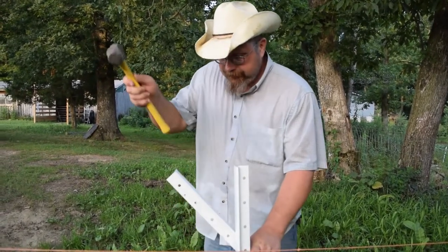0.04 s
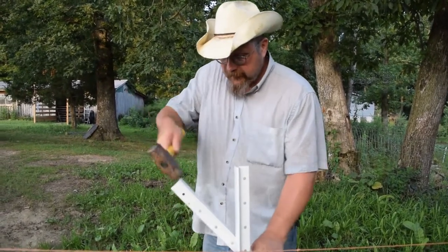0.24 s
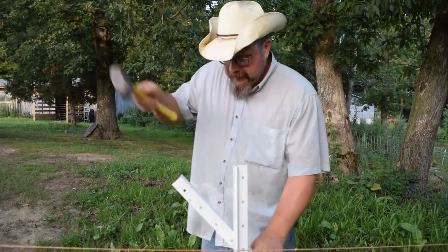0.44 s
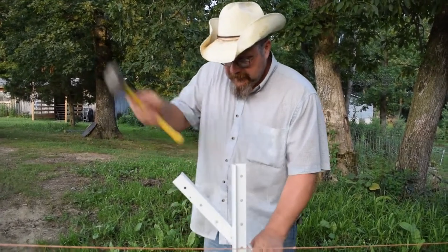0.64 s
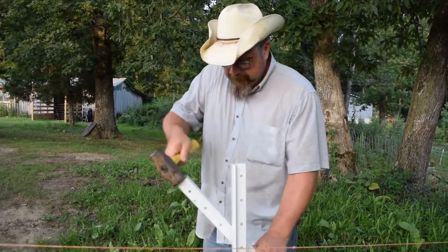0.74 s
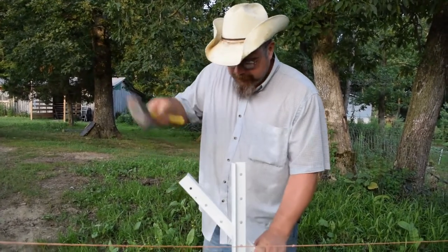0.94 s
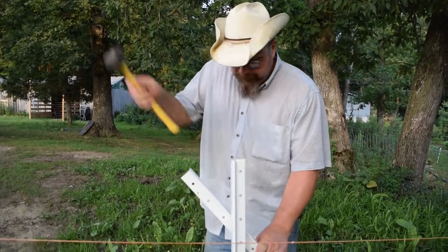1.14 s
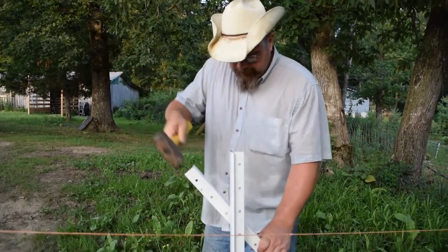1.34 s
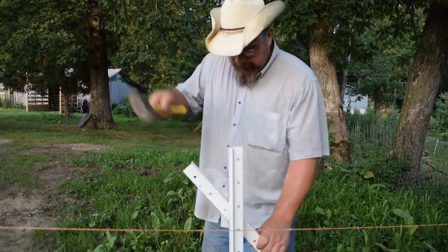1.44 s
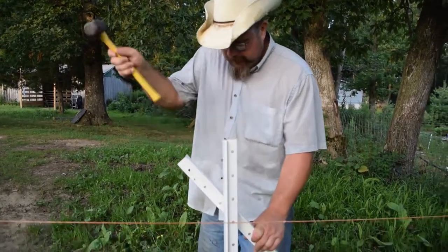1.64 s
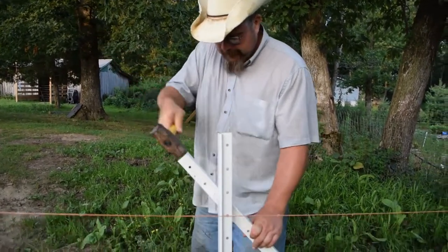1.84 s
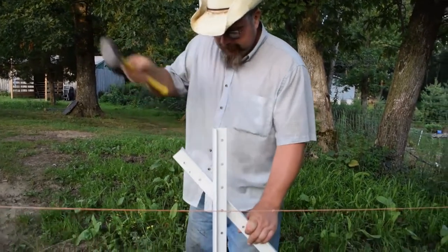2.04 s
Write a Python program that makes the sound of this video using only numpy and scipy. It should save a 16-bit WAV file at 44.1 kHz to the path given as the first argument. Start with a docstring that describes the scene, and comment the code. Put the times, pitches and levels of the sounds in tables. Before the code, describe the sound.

Close, overloaded hammer blows on hollow plastic: four sharp double-edged whacks with low thumps and short scattered return from trees. The loose brace rattles softly between hits, over quiet yard air, insects and a distant motor.

```python
"""On a lawn near trees, a steel hammer drives the plastic brace of a fence post into the soil.
Four hard blows overload the microphone: each is a noise crack with ringing modes of the brace,
a jolt against the post, a low thud of decaying sines and a noise return from the trees.
The loose brace knocks lightly between blows, as a short push and a damped ring.
Behind it are insects (resonated noise), a far motor (wavering sines) and outdoor air (shaped noise)."""
import sys
import numpy as np
from scipy import signal
from scipy.io import wavfile

SR = 44100
rng = np.random.default_rng(int(sys.argv[2]) if len(sys.argv) > 2 else 0)


def store_wav(level_fs):
    """Save 16-bit WAV to argv[1]."""
    pcm = np.round(np.clip(np.atleast_2d(level_fs), -1, 1) * 32767)
    wavfile.write(sys.argv[1], SR, pcm.T.astype(np.int16))


N = 92610
T = np.arange(N) / SR

# modes of the plastic brace, before emphasis by the place hit:
# (frequency [Hz], mean level [dB], 60 dB decay time when struck hard [s])
BRACE_MODES = [(267.4, -17.5, 0.073), (344, -20, .07), (463.4, -18, 0.095), (671, -19.5, .05),
               (891.4, -12.5, 0.063), (1227, -9.5, 0.05), (1400, -11.5, .07), (1669, -12, 0.047),
               (1860, -5, 0.027), (2114, -11, 0.037), (2270, -7.5, 0.05), (2456, -8.5, 0.034),
               (2632, -5.5, 0.04), (2820, -9, 0.055), (3052, -6, 0.017), (3437, -13, 0.05),
               (3690, -20.5, 0.04), (4477, -15.5, 0.08), (4676, -3, 0.022)]


def blows():
    """The hammer lands, the brace flexes and jolts against the post, the soil thuds and the trees answer."""
    # hammer blows, before the microphone overloads: (time [s], strike level [dB],
    # brightness tilt [dB per octave], lower and upper strongest ring [Hz],
    # jolt delay [s], jolt level [dB], hold of the jolt's crack [s], jolt low-pass [Hz],
    # bending pitch [Hz], bending level [dB], thud delay [s], thud level [dB])
    blow_table = [(0.2001, 2.8, -1, 1370, 1610, .0168, -5, 0.0061, 4500, 254.8, -16, .017, 6.4),
                  (0.7365, 2.2, -0.32, 2250, 4460, 0.01, -1.5, 0.0043, 3000, 201.6, -13.5, 0.01, 8.2),
                  (1.2616, 4.7, 0.25, 2010, 2600, .0105, -9.5, 0.0048, 5000, 213.4, -11, 0.0093, 6.2),
                  (1.8014, 2.3, 1, 2085, 2580, .0100, -8, 0.0074, 7100, 227.3, -17.5, 0.0082, 8.9)]
    out = np.zeros(N)
    for (s, db, tilt_db, lower_hz, upper_hz, jolt_s, jolt_db, jolt_hold_s, jolt_hz,
         bend_hz, bend_db, thud_s, thud_db) in blow_table:
        rings_hz = (lower_hz, upper_hz)
        strike = from_db(db) * contact(tilt_db, rings_hz, hold_s=0.0053)
        flex = from_db(bend_db) * bending(bend_hz)
        jolt = from_db(jolt_db) * butter(contact(tilt_db, rings_hz, jolt_hold_s), jolt_hz, "low", order=1)
        soil = from_db(thud_db) * thud()
        blow = strike + flex + delayed(jolt, jolt_s) + delayed(soil, thud_s) + scatter(tilt_db)
        out += delayed(blow, s)
    return out


def contact(tilt_db, rings_hz, hold_s):
    """One hard contact on the brace: a chattering crack of many damped higher modes and a short hollow ring."""
    # colour of the crack: (frequency [Hz], relative level per Hz [dB])
    crack_spectrum = [(150, 3), (600, -3), (1050, -8.5), (1600, -1.5), (2600, -1), (3800, -5.5), (5000, -5),
                      (8000, -15), (15000, -27.5)]
    crack_db, crack_t60_s = 2, 0.035
    chatter_db, chatter_per_s = 5, 682
    noise = noise_bands(crack_spectrum, tilt_db)[1].sum(0)
    crack = rms_one(noise * from_db(chatter_db * wander(chatter_per_s)))
    crack = from_db(crack_db) * crack * dying(crack_t60_s, hold_s)
    return emphasise(crack + ring(BRACE_MODES), rings_hz)


def emphasise(x, rings_hz):
    """Where the brace is hit decides which of its modes ring most: resonances add to the sound."""
    boost_db, ring_q = -4.5, 14.5
    resonant = sum(signal.lfilter(*signal.iirpeak(hz, ring_q, fs=SR), x) for hz in rings_hz)
    return x + from_db(boost_db) * resonant


def bending(hz):
    """The whole brace flexes under the blow: one low tone swells, holds and dies."""
    t60_s, hold_s, rise_s = 0.08, 0.02, 0.0076
    return np.sin(2 * np.pi * hz * T) * dying(t60_s, hold_s) * (1 - np.exp(-T / rise_s))


def thud():
    """Post and soil take the blow softly: low modes with a gradual onset."""
    # modes before the low cut: (frequency [Hz], mean level [dB], 60 dB decay time [s])
    soil_modes = [(70.5, -25, 0.13), (104, -21, 0.082), (143, -22, .095)]
    rise_s, low_cut_hz = 0.002, 49
    return butter(ring(soil_modes) * (1 - np.exp(-T / rise_s)), low_cut_hz, "high")


def scatter(tilt_db):
    """Uneven return of a blow from grass and near trees, and a fainter, longer one from the far trees."""
    # colour and near decay: (frequency [Hz], relative level per Hz [dB], near 60 dB decay time [s])
    trees = [(146, 3.5, 0.21), (500, -4.5, 0.27), (1090, -6.5, 0.31), (2140, 4, 0.25), (3650, 0.5, 0.31),
             (5840, -4.5, 0.36), (7250, -13.5, 0.31), (9700, -15.5, 0.32), (15000, -42, 0.43)]
    scatter_db, rise_s = -13, 0.015
    patchy_db, patches_per_s = 0.64, 180
    far_db, far_t60_s, far_dull_hz = -23.5, 1, 4700
    near_bands = zip(*noise_bands(trees, tilt_db))
    near = sum(band * dying(at_hz(trees, hz, axis=2)) for hz, band in near_bands)
    far_noise = noise_bands(trees, tilt_db)[1].sum(0)
    far = butter(far_noise, far_dull_hz, "low") * dying(far_t60_s)
    gain = from_db(scatter_db + patchy_db * wander(patches_per_s))
    return gain * (near + from_db(far_db) * far) * (1 - np.exp(-T / rise_s))


def knocks():
    """The loose brace touches the post and bounces once; the knock is muffled and thinned."""
    # light knocks: (time [s], level before emphasis and filtering [dB])
    knock_table = [(0.5395, -27.5), (1.487, -41.5), (1.9414, -19.5), (2.0502, -26.5)]
    bounce_s, bounce_db = 0.0037, -8
    rings_hz, soft_hz, thin_hz = (1650, 1970), 2890, 1010
    out = np.zeros(N)
    for s, db in knock_table:
        knock = touch() + from_db(bounce_db) * delayed(touch(), bounce_s)
        out += from_db(db) * delayed(knock, s)
    muffled = butter(emphasise(out, rings_hz), soft_hz, "low", order=6)
    return butter(muffled, thin_hz, "high", order=1)


def touch():
    """A soft contact: one short push and a ring of the brace, with extra damping."""
    push_db, push_t60_s, damping_t60_s = 19, 0.00054, 0.066
    return from_db(push_db) * dying(push_t60_s) + ring(BRACE_MODES) * dying(damping_t60_s)


def insects():
    """A steady chorus and one nearer insect calling in swells, each a noise-driven resonance."""
    # chorus: (frequency [Hz], resonance width [Hz], level [dB])
    chorus = [(5710, 1460, -57), (7720, 130, -63.5)]
    # nearer insect, before its swells: (frequency [Hz], resonance width [Hz], level [dB])
    caller = [(6370, 170, -59)]
    # swells of the nearer insect: (middle [s], length [s], level relative to the caller [dB])
    calls = [(.1, .14, -5), (0.598, 0.13, 0), (1.202, 0.13, -1), (1.65, .15, 1.5)]
    swell = sum(from_db(db) * np.exp(-2 * ((T - s) / length_s) ** 2) for s, length_s, db in calls)
    return drones(chorus) + swell * drones(caller)


def drones(lines):
    """Continuous wavering tones: noise passed twice through a narrow resonance each."""
    out = np.zeros(N)
    for hz, width_hz, db in lines:
        b, a = signal.iirpeak(hz, hz / width_hz, fs=SR)
        noise = rng.standard_normal(2 * N)
        tone = signal.lfilter(b, a, signal.lfilter(b, a, noise))
        out += from_db(db) * rms_one(tone[N:])  # the first half lets the resonance settle
    return out


def hum():
    """Low tones of the far motor, beating together while each wavers in level."""
    # tones before the thrum and waver: (frequency [Hz], level [dB])
    tones = [(76.5, -47.5), (85.5, -44.5), (153, -51), (183, -51.5), (269, -53)]
    # thrum of the motor: (time [s], relative level [dB])
    thrum = [(0, 0.5), (.5, 0), (.95, 0), (1.3, 0), (1.5, -6), (2.1, -2)]
    waver_db, waver_per_s = 3, 3.7
    thrum_db = np.interp(T, *np.transpose(thrum))
    out = np.zeros(N)
    for hz, db in tones:
        gain = from_db(thrum_db + db + waver_db * wander(waver_per_s))
        out += np.sqrt(2) * gain * np.sin(2 * np.pi * (hz * T + rng.random()))
    return out


def air():
    """Steady outdoor air, as shaped noise."""
    # colour: (frequency [Hz], relative level per Hz [dB])
    air_spectrum = [(25, -24), (50, -7), (80, -3), (120, -4.5), (180, -6.5), (330, -12.5), (900, -13.5),
                    (1800, -19.5), (3300, -29), (7000, -30.5), (8500, -43), (11000, -40), (13500, -67)]
    return from_db(-43) * noise_bands(air_spectrum)[1].sum(0)


def ring(modes):
    """Struck modes as decaying sines; every contact shares its force among them a little differently."""
    spread_db = 1.5
    chance = rng.standard_normal(len(modes))
    out = np.zeros(N)
    for k, (hz, db, t60) in enumerate(modes):
        gain = (-1) ** k * from_db(db + spread_db * chance[k])  # neighbours start in opposite sense
        out += gain * dying(t60) * np.sin(2 * np.pi * hz * T)
    return out


def noise_bands(spectrum, tilt_db=0):
    """Centres and bands of noise that add up to the spectrum, tilted per octave, at unit power."""
    edges = np.geomspace(20, 17000, 26)
    centres = np.sqrt(edges[1:] * edges[:-1])
    white = rng.standard_normal((2, N))  # neighbouring bands use different noise
    gains = from_db(at_hz(spectrum, centres) + tilt_db * np.log2(centres / centres.mean()))
    bands = np.array([g * butter(white[k % 2], edges[k:k + 2], "band") for k, g in enumerate(gains)])
    return centres, bands / bands.sum(0).std()


def wander(per_s):
    """Random wavering of about unit spread: straight lines between per_s random points a second."""
    return np.interp(T * per_s, np.arange(N), rng.standard_normal(N)) * np.sqrt(1.5)


def dying(t60, hold=0):
    """Envelope that holds, then falls 60 dB in t60 seconds."""
    return from_db(np.maximum(-60 * np.maximum(T - hold, 0) / t60, -300))


def delayed(x, s):
    """The same sound, starting s seconds later."""
    return np.pad(x, (max(int(s * SR), 0), 0))[:N]


def butter(x, hz, kind, order=2):
    """Causal Butterworth filter."""
    return signal.sosfilt(signal.butter(order, hz, kind, fs=SR, output="sos"), x + 1e-18)


def at_hz(table, hz, axis=1):
    """Read a column of a table on a log-frequency axis."""
    table = np.array(table)
    return np.interp(np.log(hz), np.log(table[:, 0]), table[:, axis])


def from_db(db):
    """Decibels to gain."""
    return 10 ** (np.asarray(db) / 20)


def rms_one(x):
    """Scale to unit power."""
    return x / np.sqrt(np.mean(x ** 2) + 1e-20)


def scene():
    """Hammering up close, over the quiet of a summer yard."""
    yard = insects() + hum() + air()
    return (blows() + knocks() + yard)[None]


def record(dry):
    """The microphone overloads: blows saturate towards full scale (1.0), and the top is cut."""
    hardness, cutoff_hz = 5.7, 15800
    clipped = dry / (1 + np.abs(dry) ** hardness) ** (1 / hardness)
    return signal.sosfilt(signal.ellip(10, .1, 70, cutoff_hz, fs=SR, output="sos"), clipped)


dry = scene()
out = record(dry)
store_wav(out)
```